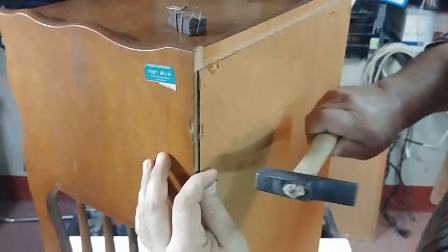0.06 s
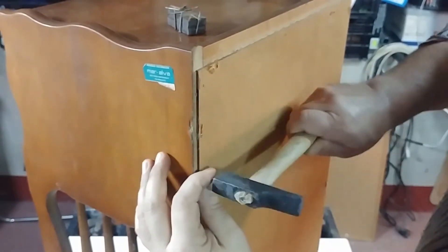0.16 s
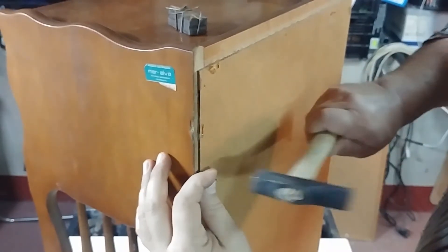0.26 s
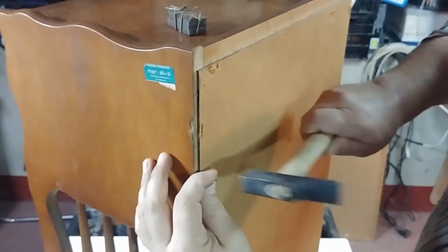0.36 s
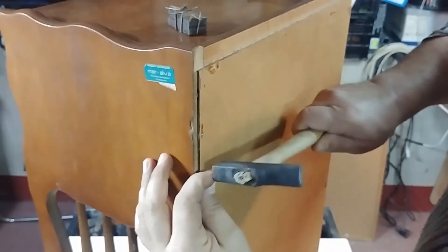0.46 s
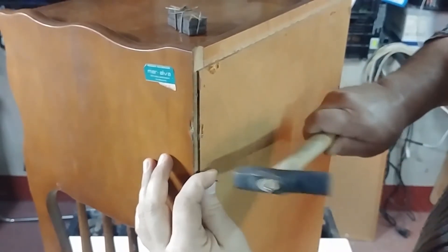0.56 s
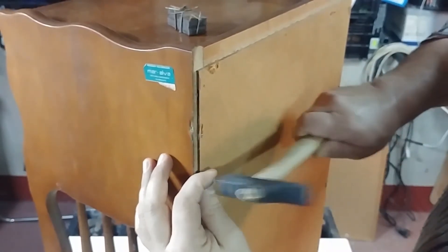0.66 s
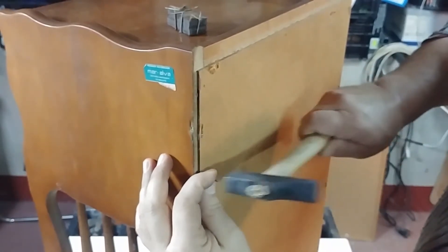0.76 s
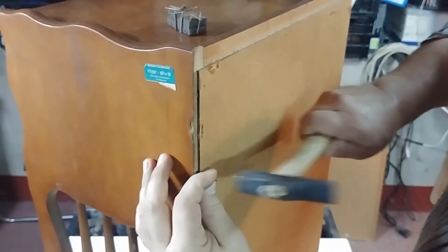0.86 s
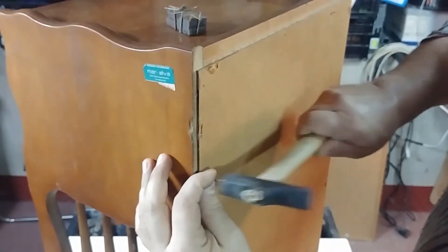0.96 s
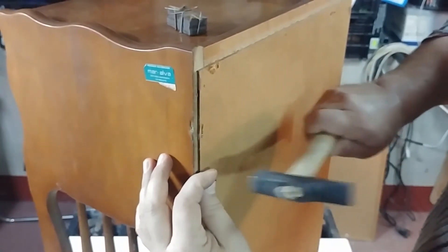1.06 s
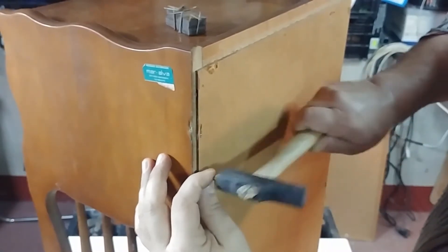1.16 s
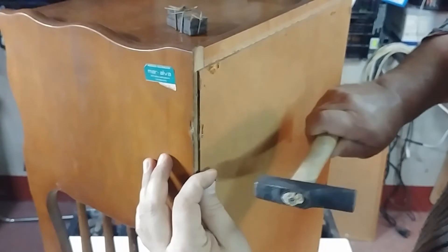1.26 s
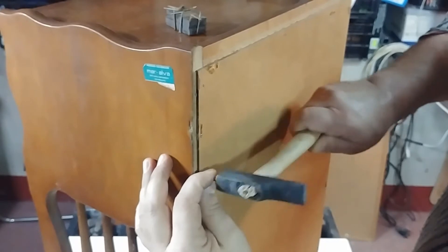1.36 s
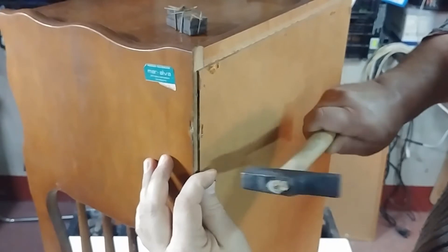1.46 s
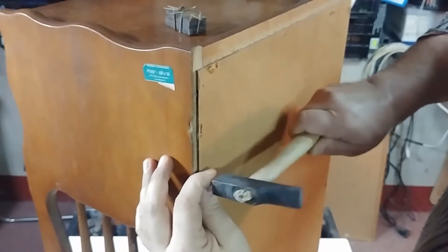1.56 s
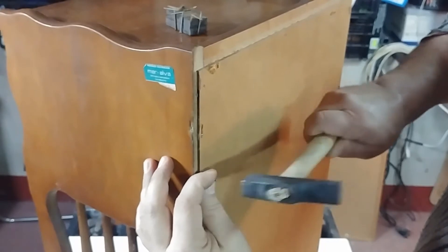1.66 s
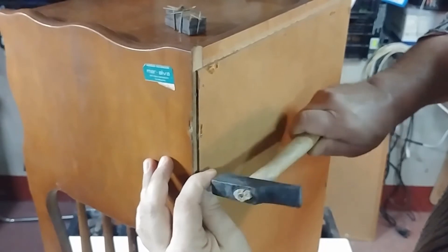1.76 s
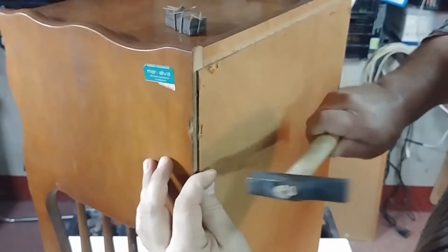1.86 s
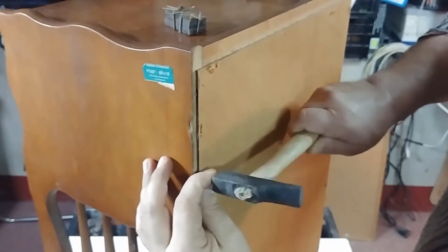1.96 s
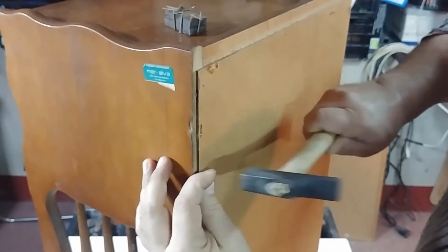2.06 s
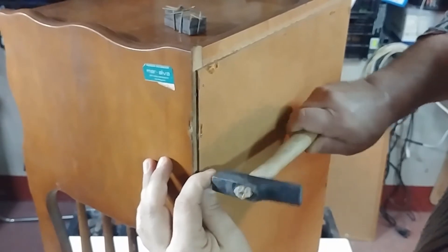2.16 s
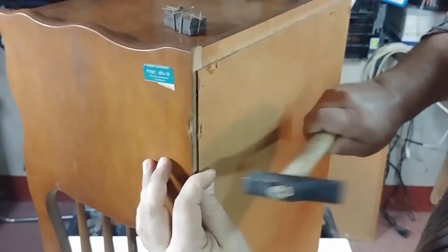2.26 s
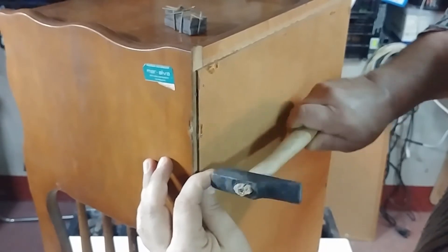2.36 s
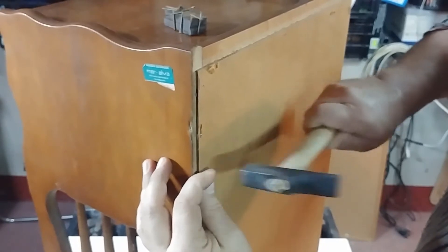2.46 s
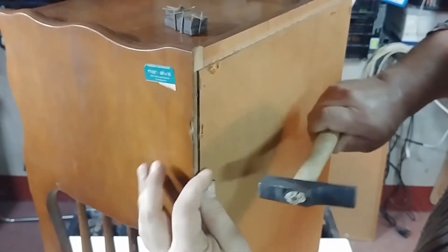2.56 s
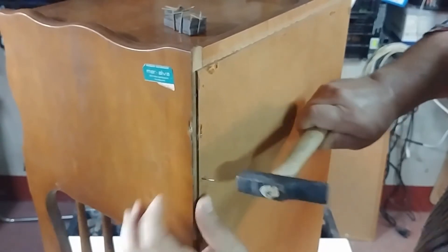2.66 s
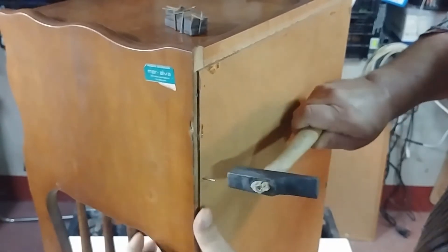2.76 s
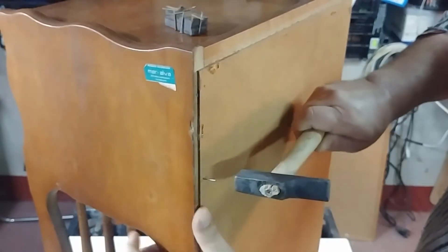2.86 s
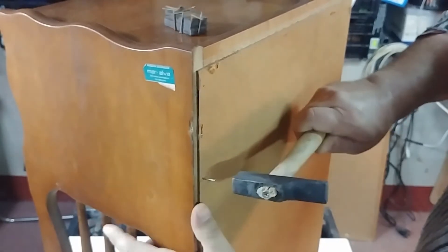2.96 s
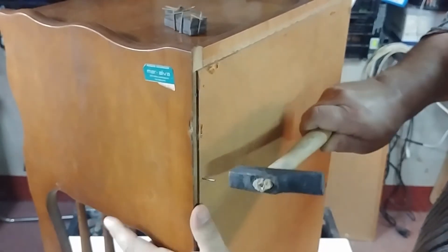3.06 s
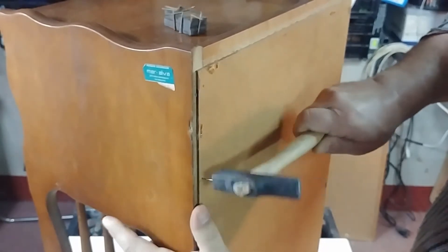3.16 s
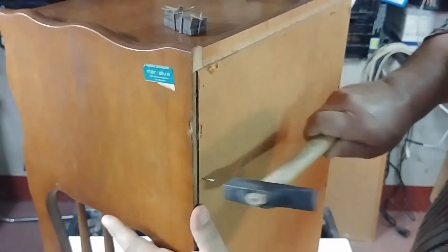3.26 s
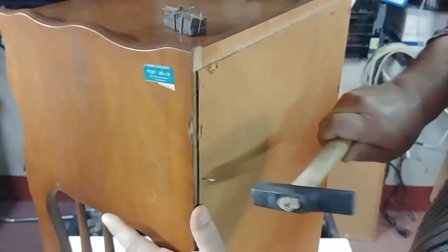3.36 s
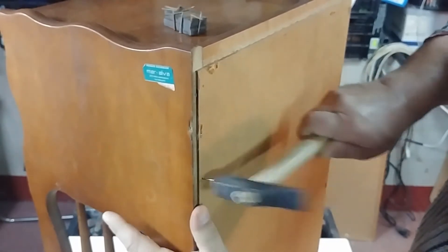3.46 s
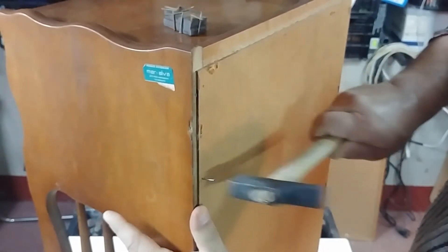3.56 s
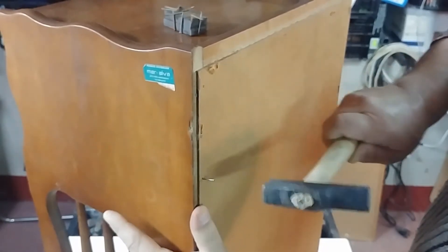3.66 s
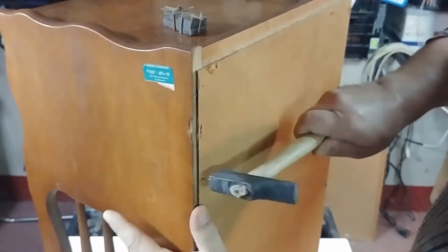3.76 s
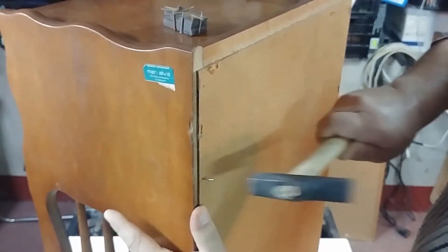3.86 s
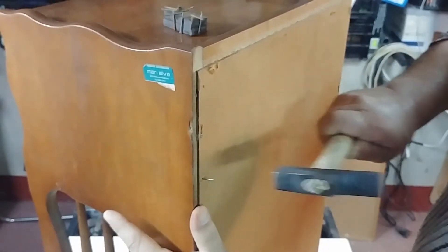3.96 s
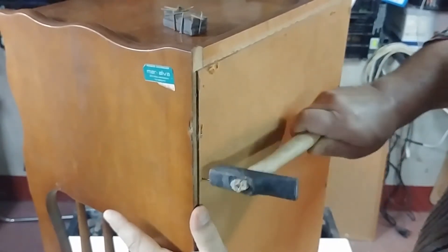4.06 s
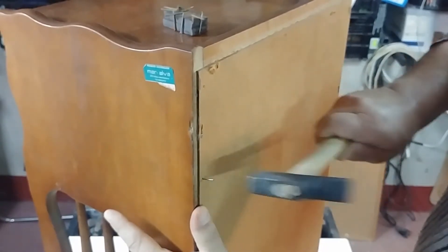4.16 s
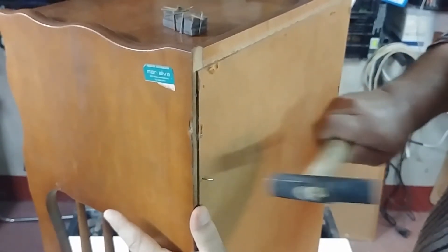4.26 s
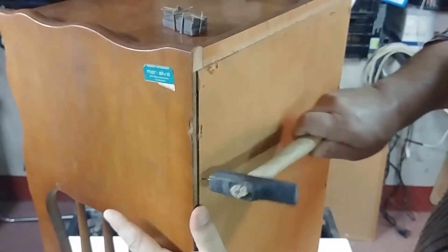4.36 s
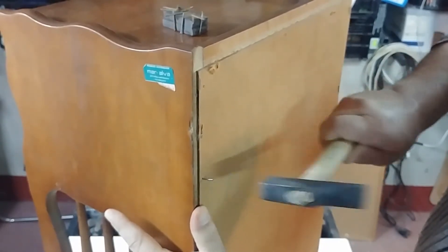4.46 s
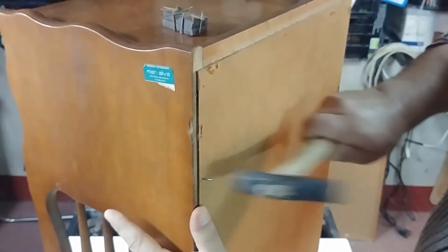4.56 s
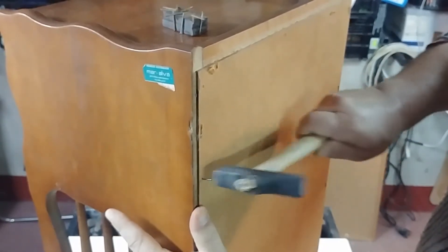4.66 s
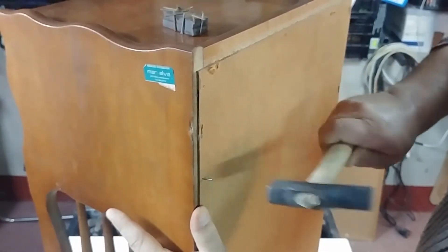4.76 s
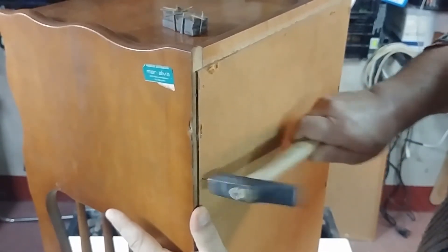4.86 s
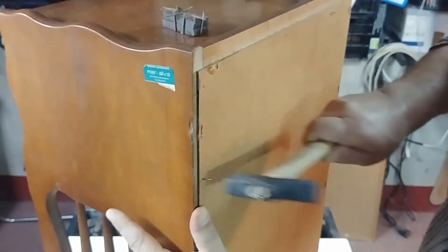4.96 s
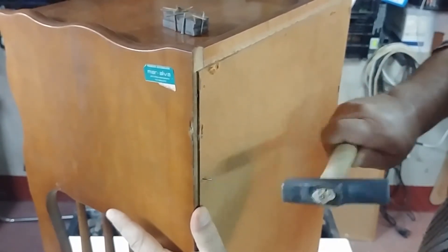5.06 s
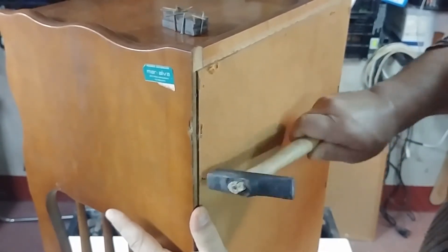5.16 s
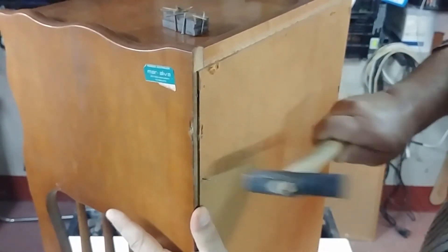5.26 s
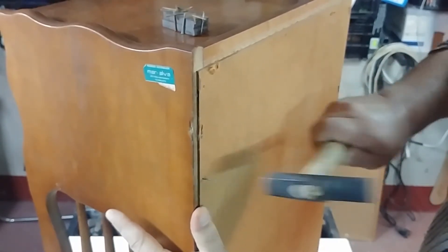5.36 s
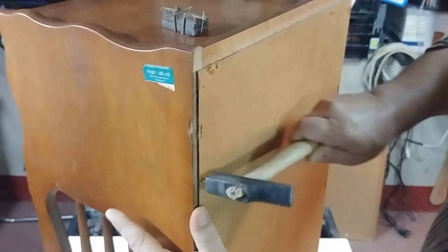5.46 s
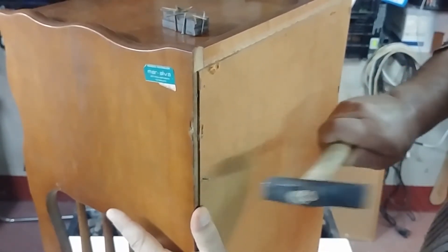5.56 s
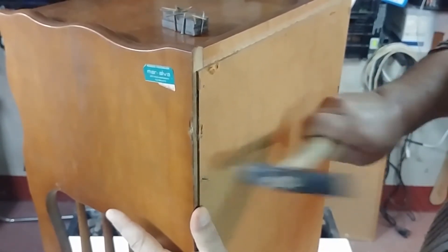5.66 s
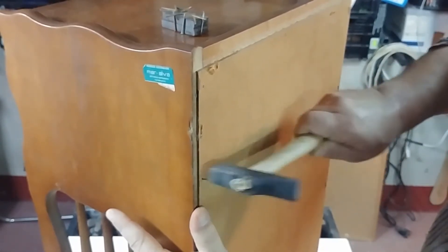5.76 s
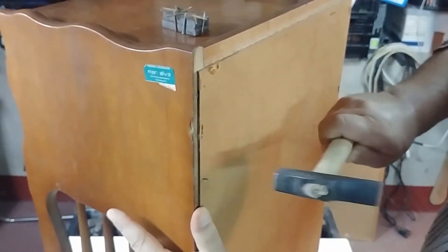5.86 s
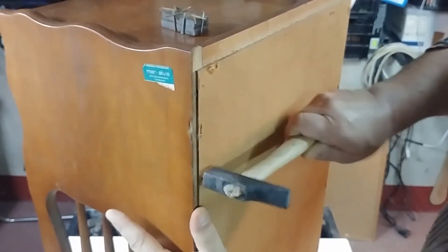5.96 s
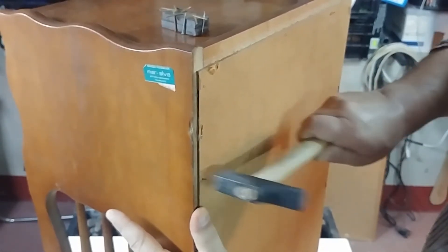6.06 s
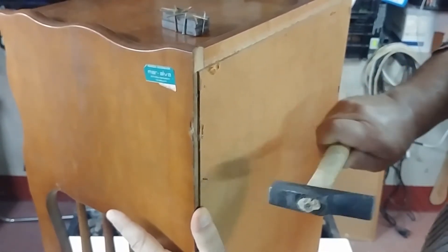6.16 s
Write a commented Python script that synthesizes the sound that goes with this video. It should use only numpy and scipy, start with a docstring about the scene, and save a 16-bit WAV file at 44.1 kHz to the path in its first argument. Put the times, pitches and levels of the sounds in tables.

```python
"""In a hard workshop, a small hammer taps pins into the back panel of a wooden cabinet, close to a stereo microphone.
Each blow sums damped modes of box, panel and steel, a band-limited click and the pin's note, spread by reflections.
A machine chugs faintly behind as short strokes of three resonances and low noise over a wavering hum.
A hand slides over the wood as shaped, uneven noise, and fingertips tick on it as very short damped sines.
Shaped noise is the air of the workshop, and a limiter on each channel flattens the start of every blow."""
import sys
import numpy as np
from scipy import signal
from scipy.io import wavfile
from scipy.ndimage import uniform_filter1d

SR = 44100
rng = np.random.default_rng(int(sys.argv[2]) if len(sys.argv) > 2 else 0)


def undo_db(level):
    """Turn decibels back into plain size, where 20 dB means ten times bigger."""
    steps = np.asarray(level, float) / 20
    return 10 ** steps


def materialize(psi):
    """Save the field psi as 16-bit PCM at rate SR to the path in sys.argv[1].

    A 1-D psi becomes a single channel; in a 2-D psi each row is a channel.
    """
    bounded = np.clip(np.atleast_2d(psi).T, -1, 1)
    quanta = np.round(bounded * 32767).astype(np.int16)
    wavfile.write(sys.argv[1], SR, quanta)


N = 273199  # length in samples

# All levels are those of the parts, ahead of the room balance and the microphone.
# Hammer blows; the pin sings higher as its free length shortens, and a new pin starts low.
# Columns: t/s, box thud level/dB, steel crack level/dB, pin f/Hz, pin level/dB (rms over the first 30 ms)
BLOWS = [(-.075, -15.5, -18, 2850, -50.5), (.178, -20.5, -7.5, 2840, -11),
         (0.7084, -13.5, -16.5, 3470, -59), (0.9312, -12, -12.5, 3230, -55),
         (1.1433, -20.5, -9, 4310, -12.5), (1.3838, -17, -25.5, 2700, -31.5),
         (1.5746, -12.5, -14.5, 2750, -25.5), (1.7777, -12, -10.5, 2590, -33.5),
         (1.9803, -11.5, -9, 2800, -43.5), (2.1836, -11, -10.5, 2690, -37), (2.3836, -10.5, -10, 3040, -17),
         (3.1949, -14, -12.5, 2084, -10.5), (3.5053, -14.5, -9.5, 2250, -14),
         (3.7797, -11.5, -6.5, 2475, -12), (4.0743, -12.5, -6, 2710, -14.5), (4.3549, -12.5, -6, 3300, -48),
         (4.6245, -11.5, -5.5, 3390, -9), (4.8992, -10, -5.5, 3730, -11.5),
         (5.1828, -10.5, -4.5, 4250, -10), (5.4498, -9.5, -2.5, 5160, -6), (5.7268, -8.5, -2, 6330, -20),
         (5.9915, -11.5, 0, 4120, -11.5)]
# Ringing of the hammer head: f/Hz, level over the crack/dB, t60/s
HAMMER_HEAD = [(6316, -26, .2)]
# Modes of the cabinet, from box through panel and ring to snap:
# f/Hz, level within the family/dB, t60/s before the family's upper limit
CABINET_MODES = [(77.9, -12.5, 0.26), (119.3, -8.5, 0.23), (144.8, -9, 0.24), (178.46, 3, 0.12),
                 (198.3, 0.5, 0.18), (223.5, -7, 0.26), (272.8, -9.5, 0.18), (319.4, -9.5, 0.19),
                 (335, -10.5, 0.33), (383, -1.5, 0.32), (444, -5.5, 0.21), (504.4, -8.5, 0.2),
                 (527.7, -8, 0.17), (568.7, 1, 0.11), (632.5, 8, 0.028), (701.4, 4, 0.043),
                 (764.5, 0, 0.081), (855, -5, .08), (894, 0, .1), (950, 0, .1), (990, -7, .06),
                 (1210, -18, 0.28), (1277, -4, 0.13), (1458, -5.5, 0.091), (1514.5, -2.5, 0.067),
                 (1591, 5, 0.043), (1867, -4, 0.056)]
# Borders between the four families: f/Hz
FAMILY_EDGES_HZ = (300, 800, 1000)
# Upper limit of decay in each family: t60/s
LONGEST_T60 = .38, .24, .11, .2
DETUNE = .007  # standard deviation of mode frequency, as a fraction
# How the wood answers as each pin bites deeper, over the thud:
# t/s, panel level/dB, ring level near 900 Hz/dB, snap level/dB
WOOD_ANSWER = [(0, 0, -1, -3.5), (1.8, 0, -2.5, -2), (2.3, -4.3, 4, -1), (3.2, -2.6, 2.5, 0.5),
               (3.8, -8, 1.7, -8), (6.1, -1.2, -0.1, -8)]
# A hard, glancing blow lifts panel, ring and snap by these shares of crack over thud [dB per dB]
HARD_SHARE = 0.059, 0.33, 0.72
# Borders of the five bands of the contact click: f/Hz
CLICK_EDGES_HZ = (140, 330, 1080, 3100, 10000, 19000)
TOP_SHARE = .45  # the top click band exceeds the thud by this share of crack over thud
# Pin sound, a broad clank and then a thinner ring on the same note: level/dB, t60/s
PIN_STAGES = [(0, .0055), (-16, .025)]
# Thin pin notes that linger: t/s, f/Hz, level/dB, t60/s
LOOSE_PIN = [(.715, 3280, -28, .14), (.715, 5450, -35, .2), (.94, 3250, -31, .14)]
# Fingertip ticks on the panel: t/s, f/Hz, level/dB, t60/s
FINGER_TICKS = [(0.089, 4720, -51, 0.00083), (2.628, 2340, -41.5, 0.00032), (2.924, 5200, -49, 0.006)]

# Mean hum of the machine: f/Hz, level/dB
HUM = [(102, -49), (141, -60)]
# Resonances rung by each machine stroke: f/Hz
CHUG_HZ = (808, 582, 230.2)
CHUG_S, PUFF_DB = 0.04, -3.5  # stroke length; noise level over the first resonance
# Accented machine strokes: t/s (sounded 4.5 ms earlier), level/dB
ACCENTS = [(.077, -47.5), (0.387, -41), (0.611, -45), (1.085, -46), (1.298, -46), (1.525, -50),
           (1.732, -41.5), (2.097, -46), (2.503, -33.5), (2.591, -41), (2.774, -48), (3.025, -50.5),
           (3.157, -48.5), (3.436, -44), (3.685, -35), (4.015, -38), (4.244, -41.5), (4.322, -43.5),
           (4.585, -44.5), (4.8, -45.5), (5.075, -43), (5.152, -42), (5.36, -42), (5.627, -39.5),
           (5.9, -43), (6.18, -39)]
STROKE_S = .078  # approximate spacing of strokes
# Plain machine strokes: t/s, level/dB
PLAIN_STROKES = [(0, -51.5), (3.1, -51), (3.5, -43), (6.2, -48)]
# Share of an accent followed by each resonance [dB per dB]
ACCENT_SHARE = 1, .3, 1
# Each resonance over the stroke: level/dB
CHUG_DB = 0, -1.5, 3.5
# Standard deviation of each resonance on plain strokes: level/dB
CHUG_SCATTER_DB = 4, 3.5, 3

# Hand along the panel, ending in a flick: t/s, mean level/dB
SLIDE = [(2.52, -45), (2.564, -51), (2.63, -44), (2.674, -49), (2.864, -49.5), (2.915, -52), (2.929, -34.5),
         (2.972, -51), (3.03, -90)]
# Relative spectral density of the sliding hiss: f/Hz, level/dB per Hz
SLIDE_COLOUR = [(760, -28.5), (1300, -33), (3670, -19), (4190, -15.5), (4960, -16), (5530, -13.5),
                (6640, -24), (8830, -22.5), (9600, -16.5), (12500, -53), (21100, -120)]
GRAIN_DB = 1.2  # rms unevenness of the hiss

# Relative spectral density of the workshop air: f/Hz, level/dB per Hz
AIR_COLOUR = [(15, -48), (25, -13.5), (95, -6), (172, -5.5), (231, -4), (335, -18), (450, -13), (573, -10),
              (729, -17.5), (833, -28.5), (1860, -35), (15000, -38)]
AIR_DB = -48.5  # rms
# Reverberation of the workshop: f/Hz, t60/s
ROOM = [(60, 0.51), (160, 0.11), (420, 0.23), (1100, 0.23), (2910, 0.24), (7680, 0.21)]
# Left-right likeness of noise and reflections: f/Hz, correlation
LIKENESS = [(60, 0.88), (180, 0.79), (550, 0.63), (1650, 0.28), (4970, -0.0), (15000, 0.0)]
# Stereo balance: f/Hz, left over right level/dB
LEAN = [(60, -9), (130, -6.5), (290, -7.5), (640, -7.5), (1410, -8), (3100, -5.5), (6820, -9),
        (15000, -11.5)]
# Overall tone: level falls towards the treble, with a notch near 10.5 kHz and a steep top end: f/Hz, level/dB
TONE = [(20, -17.5), (48, -1.5), (70, -2), (200, -3), (3000, -4), (6000, -8.5), (8000, -11.5), (9300, -22),
        (10500, -40.5), (11500, -29.5), (13000, -24.5), (15700, -20.5), (15950, -47), (22050, -57)]


def evened(x, size=None):
    """Normalization: scales to rms 1 over the first samples."""
    return x / np.sqrt(np.mean(x[..., :size] ** 2) + 1e-20)


def read(points, hz):
    """Interpolation of a table on a logarithmic frequency axis."""
    f, value = np.transpose(points)
    return np.interp(np.log(hz + 1), np.log(f + 1), value)


def add(mix, s, sound):
    """Superposition: adds a sound at second s of a track that starts one second early."""
    part = mix[round((s + 1) * SR):][:len(sound)]
    part += sound[:len(part)]


def band(x, lo_hz, hi_hz):
    """Band limitation by a Butterworth filter."""
    sections = signal.butter(2, [lo_hz, min(hi_hz, .49 * SR)], "band", fs=SR, output="sos")
    return signal.sosfilt(sections, x)


def ring(modes, spread_db=2.0, rise_s=0.00091, detune=0.0):
    """Modal superposition: exponentially damped sines whose heights and pitches scatter at every call."""
    hz, db, t60 = np.transpose(modes)[:, :, None]
    t = np.arange(SR // 2) / SR
    db = db + spread_db * rng.standard_normal(hz.shape)
    hz = hz * (1 + detune * rng.standard_normal(hz.shape))
    decaying = undo_db(db - 60 * t / t60) * np.sin(2 * np.pi * hz * t)
    return decaying.sum(0) * (1 - np.exp(-t / rise_s))


def stereo_noise(size, shape_db, window):
    """Partial coherence: two partly alike noises whose short-time spectrum follows shape_db(hz, t)."""
    hop = window // 4
    hz = np.fft.rfftfreq(window, 1 / SR)[:, None]
    t = np.arange(size // hop + 5) * hop / SR
    a, b, c, d = rng.standard_normal((len(t), len(hz), 4)).T
    left, other = a + 1j * b, c + 1j * d
    same = np.clip(read(LIKENESS, hz), -1, 1)
    right = same * left + np.sqrt(1 - same ** 2) * other
    spectrum = np.array([left, right]) * undo_db(shape_db(hz, t))
    return signal.istft(spectrum, nperseg=window, noverlap=window - hop)[1][:, :size]


def room(x):
    """Diffuse reverberation: dense reflections build up, and each band dies at its own speed."""
    tail = stereo_noise(SR // 2, lambda hz, t: -60 * t / read(ROOM, hz), window=256)
    tail *= 1 - np.exp(-np.arange(SR // 2) / (0.00056 * SR))
    tail = tail / np.linalg.norm(tail, axis=1, keepdims=True)
    return signal.fftconvolve(x[None], tail, axes=1)[:, :len(x)]


def workshop_air():
    """Stationary random noise with a fixed spectral density."""
    return undo_db(AIR_DB) * evened(stereo_noise(N, lambda hz, t: read(AIR_COLOUR, hz) + 0 * t, window=2048))


def machine_hum():
    """Amplitude and phase modulation: two low tones waver slowly and at random."""
    t = np.arange(N) / SR
    drift = uniform_filter1d(rng.standard_normal((len(HUM), N)), 1300)
    waver = evened(uniform_filter1d(drift, 1300))
    return sum(np.sqrt(2) * undo_db(db + 3.2 * w) * np.sin(2 * np.pi * hz * t + 0.41 * w)
               for (hz, db), w in zip(HUM, waver))


def hammer():
    """Impact excitation: blows ring the cabinet and send a sharp click and the pin's note into the room."""
    near, burst = np.zeros(N + SR), np.zeros((2, N + SR))
    start = round(.03 * SR)  # span over which levels are set
    impulse = signal.unit_impulse(SR // 10)
    edges = zip(CLICK_EDGES_HZ, CLICK_EDGES_HZ[1:])
    # alternating signs let neighbouring bands join
    click_parts = [(-1) ** k * evened(band(impulse, *e), start) for k, e in enumerate(edges)]
    modes = np.array(CABINET_MODES)
    family = np.searchsorted(FAMILY_EDGES_HZ, modes[:, 0])
    modes[:, 2] = np.minimum(modes[:, 2], np.take(LONGEST_T60, family))  # wood damping
    times, *answers_db = np.transpose(WOOD_ANSWER)
    for s, thud_db, crack_db, pin_hz, pin_db in BLOWS:
        hardness_db = crack_db - thud_db
        wood_db = [thud_db] + [thud_db + np.interp(s, times, db) + share * hardness_db
                               for db, share in zip(answers_db, HARD_SHARE)]
        for k, db in enumerate(wood_db):
            members = modes[family == k]
            wood = ring(members, rise_s=5.24 / members[-1, 0], detune=DETUNE)
            add(near, s, undo_db(db) * evened(wood, start))
        add(near, s, undo_db(crack_db) * ring(HAMMER_HEAD))

        top_db = thud_db + TOP_SHARE * hardness_db
        click_db = wood_db[0] - 4, wood_db[1] - .6, wood_db[3] - 2, crack_db, top_db
        contact = sum(undo_db(db) * part for db, part in zip(click_db, click_parts))
        pin = ring([(pin_hz, *stage) for stage in PIN_STAGES], 0.83, rise_s=0.000076)
        pin = undo_db(pin_db) * evened(pin, start)[:SR // 10]
        # a random mix of two reflection patterns varies each blow
        turn = rng.uniform(0, 2 * np.pi)
        add(burst[0], s, np.cos(turn) * contact - np.sin(turn) * pin)
        add(burst[1], s, np.sin(turn) * contact + np.cos(turn) * pin)
        add(near, s, undo_db(-24) * contact)
    for s, hz, db, t60 in LOOSE_PIN:
        add(burst[0], s, undo_db(db) * evened(ring([(hz, 0, t60)], rise_s=0.00014), start))
    return (undo_db(-4.5) * near + room(burst[0] + undo_db(-8.5) * near) + room(burst[1]))[:, SR:]


def stroke_list():
    """Periodic excitation: (s, plain dB, accent dB), with plain strokes spread evenly between accents."""
    rows = []
    for (s, db), (next_s, _) in zip(ACCENTS, ACCENTS[1:] + [(N / SR + STROKE_S, 0)]):
        count = max(round((next_s - s) / STROKE_S), 1)
        times = np.linspace(s, next_s, count, endpoint=False)
        plain_db = np.interp(times, *np.transpose(PLAIN_STROKES))
        rows.append((s, plain_db[0], db - plain_db[0]))
        rows += [(u, p, 0) for u, p in zip(times[1:], plain_db[1:])]
    return rows


def machine_strokes():
    """Resonance under short excitation: dull strokes sound three tones and a puff of low noise."""
    strokes, t = np.zeros(N + SR), np.arange(SR // 10) / SR
    shape = (1 - np.exp(-t / 0.0009)) / (1 + (t / CHUG_S) ** 5)
    for s, plain_db, accent_db in stroke_list():
        scatter_db = np.multiply(CHUG_SCATTER_DB, rng.standard_normal(len(CHUG_HZ)))
        scatter_db = scatter_db * (.4 if accent_db else 1)  # accents are steadier
        peak_db = plain_db + np.multiply(ACCENT_SHARE, accent_db) + CHUG_DB + scatter_db
        tones = sum(undo_db(db) * np.sin(2 * np.pi * (hz * rng.normal(1, 0.0078) * t + rng.random()))
                    for hz, db in zip(CHUG_HZ, peak_db))
        low_noise = band(band(rng.standard_normal(len(t)), 240, 1300), 240, 1300)
        puff = undo_db(peak_db[0] + PUFF_DB) * evened(low_noise)
        add(strokes, s - .0045, shape * (tones + puff))
    return strokes[SR:] + undo_db(-9) * room(strokes)[:, SR:]


def finger_ticks():
    """Strongly damped oscillation: each fingertip tick is one very short sine, heard through the room."""
    ticks = np.zeros(N + SR)
    for s, hz, db, t60 in FINGER_TICKS:
        add(ticks, s, undo_db(db) * evened(ring([(hz, 0, t60)], rise_s=0.00014), round(.03 * SR)))
    return room(ticks)[:, SR:]


def slide():
    """Friction noise: skin on wood gives a soft hiss that catches unevenly."""
    s, db = np.transpose(SLIDE)
    hiss = evened(stereo_noise(N, lambda hz, t: read(SLIDE_COLOUR, hz) + 0 * t, window=256))
    catch_db = GRAIN_DB * evened(uniform_filter1d(rng.standard_normal(N), size=300))
    return hiss * undo_db(np.interp(np.arange(N) / SR, s, db, -120, -120) + catch_db)


def scene():
    """Linear superposition of air, machine, hammer and hand."""
    machine = machine_hum() + machine_strokes()
    return workshop_air() + hammer() + machine + finger_ticks() + slide()


def microphone(dry):
    """Minimum-phase filtering: sets the tone, makes the right louder and the left slightly earlier."""
    hz = abs(np.fft.fftfreq(8192, 1 / SR))
    log_gain = np.log(undo_db(read(TONE, hz) + np.array([[.5], [-.5]]) * read(LEAN, hz)))
    colour = np.fft.ifft(np.exp(np.conj(signal.hilbert(log_gain)))).real[:, :2048]
    x = signal.fftconvolve(dry, colour, axes=1)[:, :N]
    x[0] = np.roll(x[0], -2)  # samples
    return x


def limiter(x):
    """Dynamic gain reduction: each channel's peaks above -1 dB are pressed down, then gain recovers."""
    level_db = 20 * np.log10(abs(x) + 1e-9)
    fall = np.arange(N) * 500.0 / SR  # recovery of 500 dB a second
    held_db = np.maximum.accumulate(level_db + fall, axis=1) - fall
    over_db = np.maximum(held_db + 1, 0)
    return x / undo_db(0.95 * uniform_filter1d(over_db, 30, axis=1))


def low_pass(x):
    """Removes everything above the highest recorded frequency."""
    return signal.sosfilt(signal.butter(12, 16590, fs=SR, output="sos"), x)


def record(dry):
    """Signal chain in series: microphone, limiter and clipping at full scale."""
    mix = np.clip(limiter(microphone(dry)), -1, 1)
    return low_pass(mix)


dry = scene()
out = record(dry)
materialize(out)
```